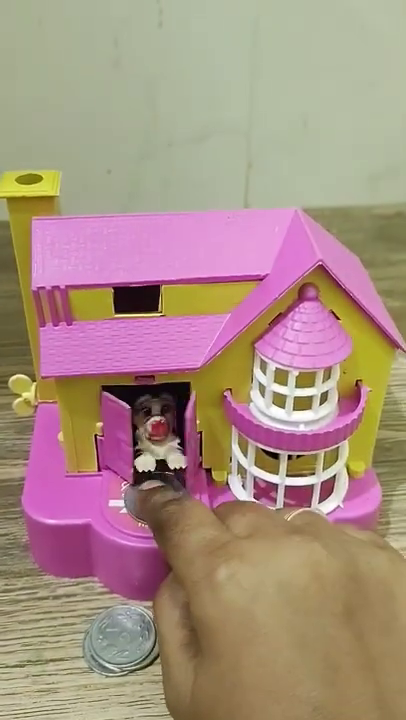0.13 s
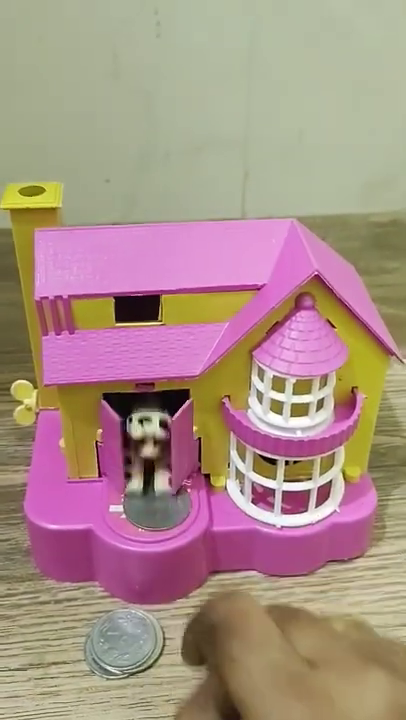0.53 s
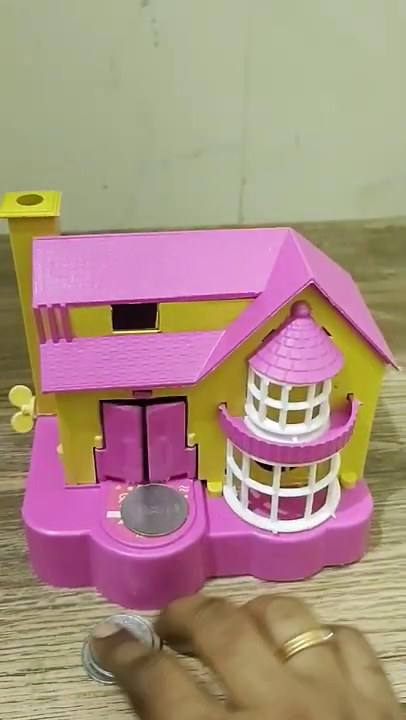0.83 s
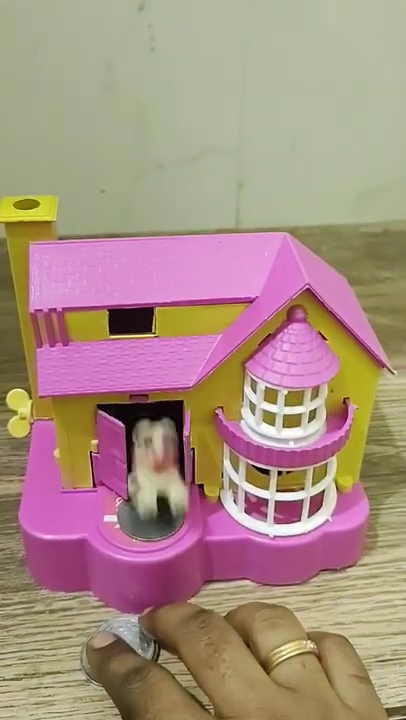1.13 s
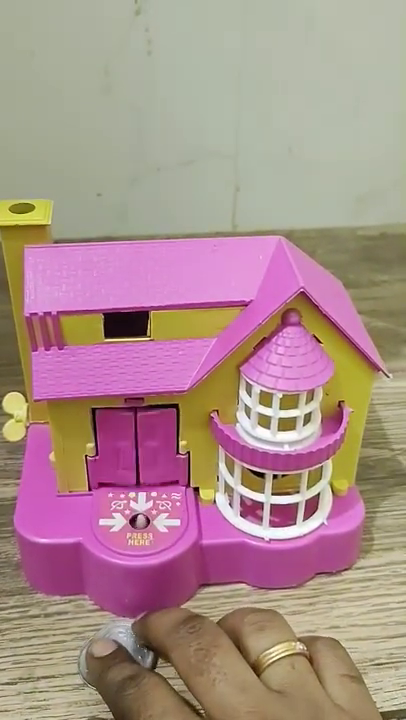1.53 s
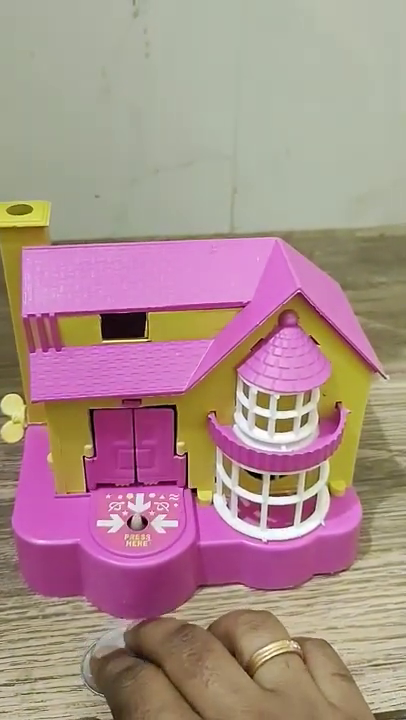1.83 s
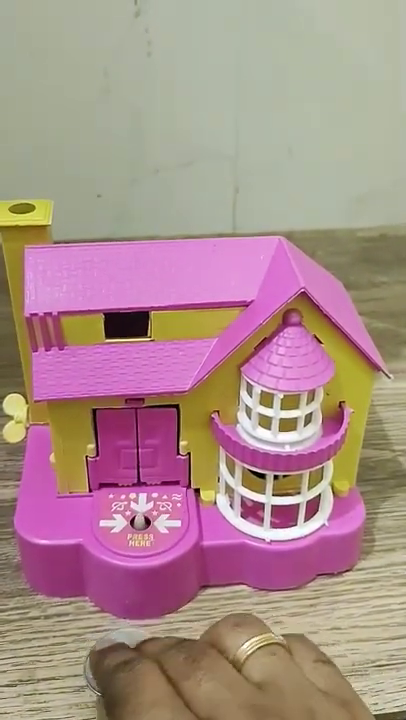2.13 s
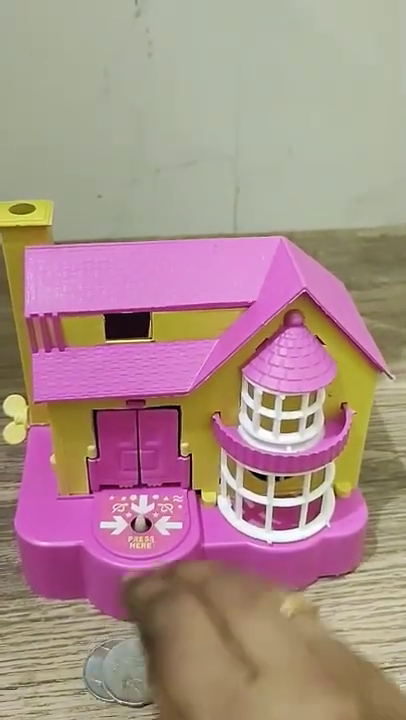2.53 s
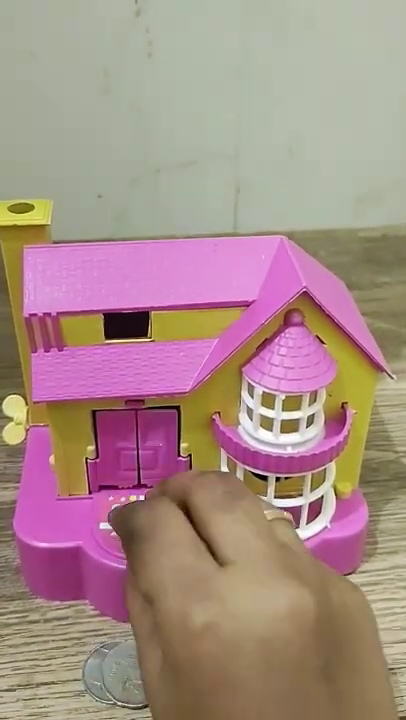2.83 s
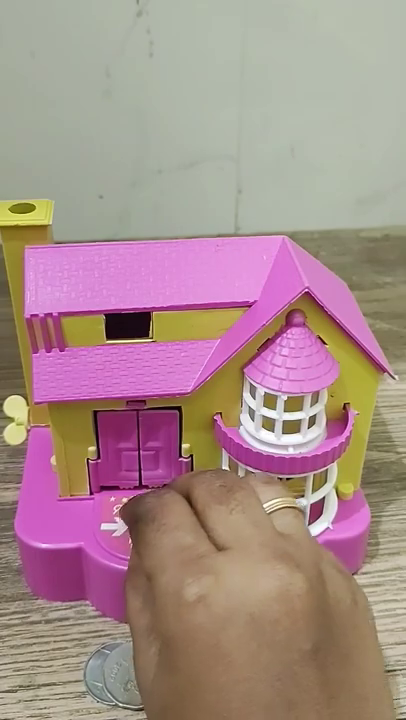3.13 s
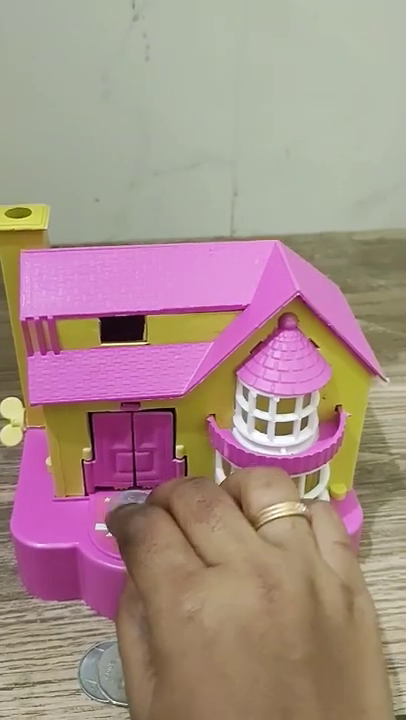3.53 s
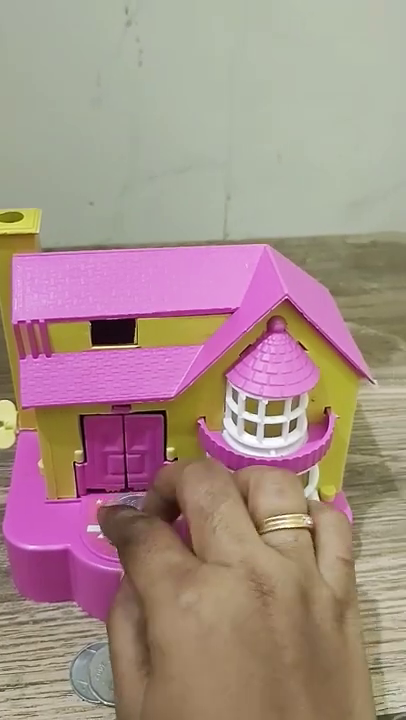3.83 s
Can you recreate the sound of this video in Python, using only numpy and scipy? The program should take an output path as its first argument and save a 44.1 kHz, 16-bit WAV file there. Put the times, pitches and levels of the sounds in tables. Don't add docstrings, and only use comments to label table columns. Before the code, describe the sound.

Loud clockwork gear rattle with knocking plastic doors runs down, followed by faint coin clinks and a tick.

```python
import sys
import numpy as np
from scipy import signal
from scipy.fft import rfft, irfft, next_fast_len
from scipy.io import wavfile
from scipy.ndimage import uniform_filter1d

SR = 44100
rng = np.random.default_rng(int(sys.argv[2]) if len(sys.argv) > 2 else 0)


def voltage_ratio(level):
    return 10 ** (np.asarray(level, float) / 20)


def transcribe(signal):
    frames = np.atleast_2d(signal).T
    limited = np.clip(frames, -1, 1)
    pcm = np.round(limited * 32767).astype(np.int16)
    wavfile.write(sys.argv[1], SR, pcm)


N = 176400
T = np.arange(N) / SR
BINS_HZ = np.arange(1, N // 2 + 2) * SR / N
MURMUR_FLUTTER_DB = 0.3


def rms_one(x):
    return x / np.sqrt(np.mean(x ** 2) + 1e-20)


def in_time(rows):
    s, *columns = np.transpose(rows)
    return [np.interp(T, s, column) for column in columns]


def at_hz(points, hz):
    points_hz, values = np.array(points).T
    return np.interp(np.log(hz), np.log(points_hz), values)


def drift(rate):
    pole = np.exp(-80 * np.pi * rate / SR)
    noise = rng.standard_normal(N // 40 + 2002)
    slow = signal.lfilter([1], [1, -2 * pole, pole * pole], noise)[2000:]
    return np.interp(np.arange(N) / 40, np.arange(len(slow)), rms_one(slow))


def noise_pair():
    return rng.standard_normal((2, N))


# pitch_hz, likeness (0-1)
LIKENESS = [(60, 1.0), (130, .99), (290, .75), (640, .85), (1400, .4), (3000, .15), (8000, 0.01)]
# pitch_hz, left_minus_right_db
LEAN = [(130, 0), (330, -3.5), (700, 3.5), (1300, .4), (2400, -2), (4400, -3.5), (9000, -1.5)]


def spread(pair):
    alike = np.clip(at_hz(LIKENESS, BINS_HZ), 0, 1)
    mid, side = rfft(pair)
    sign = np.array([[1], [-1]])
    left_right = np.sqrt(1 + alike) * mid + sign * np.sqrt(1 - alike) * side
    return irfft(left_right * voltage_ratio(sign * at_hz(LEAN, BINS_HZ) / 2), N)


def colour(pair, spectrum):
    low_hz, high_hz = spectrum[0][0], spectrum[-1][0]
    gain = voltage_ratio(at_hz(spectrum, BINS_HZ)) / (1 + (low_hz / BINS_HZ) ** 6) / (1 + (BINS_HZ / high_hz) ** 6)
    return rms_one(spread(irfft(rfft(pair) * gain, N)))


def bed(rows, spectrum, flutter_db, rate):
    level = voltage_ratio(in_time(rows)[0] + flutter_db * drift(rate))
    return level * colour(noise_pair(), spectrum)


def ring(clicks, hz, t60):
    r, w = voltage_ratio(-60 / (t60 * SR)), 2 * np.pi * hz / SR
    return signal.lfilter([0, np.sin(w)], [1, -2 * r * np.cos(w), r * r], clicks + 1e-18)


def strike(s, db, modes, dull_hz=1e6):
    out = np.zeros((2, N))
    luck = rng.normal(0, 1, (len(s), 2, len(modes)))
    for k, (hz, level_db, t60) in enumerate(modes):
        clicks = np.zeros((2, N))
        sign = (-1) ** k * np.sign(luck[:, ::-1, k] + [9, 0])
        size = voltage_ratio(db + level_db) / (1 + (hz / dull_hz) ** 2)
        clicks[:, (s * SR).astype(int)] = (size[:, None] * voltage_ratio(1.5 * luck[:, :, k]) * sign).T
        out += ring(clicks, hz, t60)
    return out


def puffs(s, db, decay_s):
    clicks = np.zeros(N)
    clicks[(s * SR).astype(int)] = voltage_ratio(db)
    return signal.lfilter([1], [1, -np.exp(-1 / (decay_s * SR))], clicks + 1e-18)


# start_s, level_db
HANDLING = [(0, -38), (.13, -36.5), (.41, -44.5), (.44, -26), (.52, -27), (.6, -28.5), (.75, -37),
            (.785, -27), (.96, -38), (1.05, -41), (1.4, -71), (3.035, -48.5), (3.06, -35), (3.14, -32),
            (3.26, -34), (3.38, -38), (3.45, -31.5), (3.62, -41), (3.7, -45.5), (3.82, -41.5), (4, -52.5)]
# pitch_hz, level_db (per Hz)
HANDLING_COLOUR = [(45, -20.5), (58, 1.5), (68, 4.5), (84, 0), (100, -1.5), (150, -9.5), (200, -23.5),
                   (450, -19.5)]
GRIP_EVEN_S, GRIP_EVEN = 0.05, 0.7


def handling():
    rumble = colour(noise_pair(), HANDLING_COLOUR)
    swell = uniform_filter1d(np.mean(rumble ** 2, axis=0), size=int(GRIP_EVEN_S * SR)) + 1e-3
    return voltage_ratio(in_time(HANDLING)[0]) * rms_one(rumble / swell ** (GRIP_EVEN / 2))


# pitch_hz, level_db (rms)
HUM = [(99.5, -61), (199.3, -50)]


def hum():
    out = 0
    for hz, db in HUM:
        level = np.sqrt(2) * voltage_ratio(db + 0.69 * drift(16.0))
        out = out + level * np.sin(2 * np.pi * hz * T + 0.3 * drift(10.0))
    return out


# start_s, level_db
ROOM = [(.05, -37), (1.98, -40.5), (2.4, -41.5), (2.65, -45.5), (3.03, -49), (3.2, -43.5), (3.7, -45.5),
        (4, -47.5)]
# pitch_hz, level_db (per Hz)
ROOM_COLOUR = [(60, -4), (120, 0), (170, -16), (350, -10), (600, -10), (1500, -15.5), (2900, -20.5),
               (3300, -33), (5000, -47.5)]


def room_murmur():
    return bed(ROOM, ROOM_COLOUR, flutter_db=MURMUR_FLUTTER_DB, rate=7.2)


# start_s, level_db
HISS = [(0, -67), (1.95, -65), (2.3, -67.5), (3.0, -72), (3.12, -75.5), (4, -71.5)]
# pitch_hz, level_db (per Hz)
HISS_COLOUR = [(3000, 1.5), (8000, -12), (17000, -17.5)]


def thin_hiss():
    return bed(HISS, HISS_COLOUR, flutter_db=MURMUR_FLUTTER_DB, rate=5)


# pitch_hz, width_hz, level_db
CASE = [(330, 30, -17), (578, 50, -10), (682, 55, 0), (785, 80, 0), (1040, 100, -13), (1435, 40, -14),
        (1620, 45, -4), (1786, 45, -7), (1920, 45, -11), (2510, 50, -9), (2724, 30, -11), (3510, 80, -9),
        (4620, 30, -8), (4975, 40, -3), (5650, 120, -9), (5953, 40, -5)]
# start_s, peak_db, dullness_hz
KNOCKS = [(.073, -32.5, 800), (.0765, -10, 1426), (.085, -23.5, 2230), (.117, -18, 1300),
          (.14, -20.5, 1300), (.202, -21.5, 1400), (.258, -23, 1300), (.473, -21, 1200), (.575, -23, 2500),
          (.606, -25, 1400), (.653, -27.5, 1300), (.735, -16.5, 1300), (.788, -19, 1400), (.928, -22, 1400),
          (1.13, -25, 1800), (1.344, -20.5, 1300), (1.367, -25.5, 1200), (1.370, -17, 2600),
          (1.377, -17, 1300), (1.387, -23, 1600), (1.405, -21.5, 1600), (1.459, -21, 1300),
          (1.666, -23, 1800), (1.734, -19, 1100), (1.7495, -15, 2000), (1.759, -18.5, 2200),
          (1.784, -15.5, 2600), (1.791, -21.5, 1600), (1.798, -26, 1500), (1.804, -25.5, 2600),
          (1.815, -21, 1200), (1.849, -29, 1200), (1.859, -20.5, 1100), (1.9015, -18.5, 1198)]
# start_s, level_db
SLAMS = [
    (0.076, -29),
    (1.751, -30.5),
    (1.786, -28),
]
# pitch_hz, level_db, t60_s
BASE = [(335, 0, 0.066)]
KNOCK_DB, KNOCK_WIDEN, KNOCK_LOW_HZ = 0, 0.85, 560
CRACK_DB, CRACK_S = -9.5, 0.0067


def knocks():
    s, db, dull_hz = np.transpose(KNOCKS)
    modes = [(hz, level_db, np.log(9) / width / KNOCK_WIDEN) for hz, width, level_db in CASE[:12]]
    no_bass = signal.butter(3, KNOCK_LOW_HZ, "high", fs=SR, output="sos")
    body = signal.sosfilt(no_bass, strike(s, db + KNOCK_DB, modes, dull_hz))
    body = body + strike(*np.transpose(SLAMS), BASE)
    crack_band = signal.butter(2, [700, 4500], "band", fs=SR, output="sos")
    crack = rms_one(signal.sosfilt(crack_band, noise_pair()))
    hardness_db = 20 * np.log10(dull_hz / 1300)
    return spread(body + puffs(s, db + CRACK_DB + hardness_db, CRACK_S) * crack)


PATCH_DB, PATCH_PER_S = 1.0, 15


def patches(x):
    whole = rfft(x)
    place = 2 * np.log2(np.clip(BINS_HZ, 1000, 16000) / 1000)
    out = 0
    for k in range(9):
        band = irfft(whole * np.clip(1 - abs(place - k), 0, 1), N)
        out = out + voltage_ratio(PATCH_DB * drift(PATCH_PER_S)) * band
    return out


# start_s, level_db, case_boom_db, panel_ring_db
DRIVE = [(.07, -31.5, 15.5, 13), (.2, -27, 3.5, 4), (.34, -25.5, 1, -3), (.42, -26.5, 5.5, 3),
         (.59, -24, 1.5, -0.5), (.72, -26, 3, 3.5), (.78, -24.5, 2, 6), (1.0, -24, 3, 3),
         (1.33, -26, 1.5, 4.5), (1.47, -25, -2, 3.5), (1.51, -28, -2.5, 4), (1.7, -23, 0.5, 2),
         (1.85, -26, 3.5, 5.5), (1.885, -36.5, -2, 9.5), (1.95, -54, 6.5, 2), (2.01, -85.5, 20, 2.5)]
# pitch_hz, level_db (per Hz)
RATTLE = [(400, -24), (600, -5.5), (1200, -5.5), (3000, -1.5), (5200, -2), (8000, -4.5), (10800, -8),
          (17000, 0)]
START_S, START_RISE_S = 0.074, 0.0021
TEETH_PER_S, TOOTH_SPREAD_DB, RATTLE_FLUTTER_DB = 10000, 1.5, 0.9
RATTLE_DB, CASE_DB, CASE_GAIN = 4, -5.5, 90
HOLLOW_HZ = 1200


def gears():
    level_db, boom_db, sing_db = in_time(DRIVE)
    contacts = rng.random((2, N)) < TEETH_PER_S / SR
    force = voltage_ratio(TOOTH_SPREAD_DB * rng.exponential(1, (2, N)))
    teeth = contacts * force * rng.choice([-1, 1], (2, N))
    teeth *= voltage_ratio(RATTLE_FLUTTER_DB * drift(35))
    case = np.zeros((2, N))
    for k, (hz, width, db) in enumerate(CASE):
        drive_db = boom_db if hz < HOLLOW_HZ else sing_db
        level = voltage_ratio(db + drive_db + 1.28 * drift(16)) * np.sqrt(width)
        case += level * ring(teeth[::-1, ::-1], hz, np.log(9) / width) * (-1) ** k
    rattle = voltage_ratio(RATTLE_DB) * patches(colour(teeth, RATTLE))
    running = np.clip((T - START_S) / START_RISE_S, 0, 1) * (T < DRIVE[-1][0])
    return running * voltage_ratio(level_db) * (rattle + voltage_ratio(CASE_DB) * spread(case) / CASE_GAIN)


# start_s, level_db
RUB = [(1.9, -80), (2.27, -80), (2.32, -61), (2.42, -69), (2.46, -61), (2.65, -79), (3.05, -87),
       (3.09, -53.5), (3.18, -49.5), (3.37, -56), (3.42, -52), (3.51, -49.5), (3.56, -46), (3.62, -54),
       (3.75, -62), (4, -86)]
# pitch_hz, level_db (per Hz)
RUB_COLOUR = [(600, -0.5), (1800, 0), (2750, 6), (3500, -7.5), (4500, -10), (6500, -13), (17000, -34.5)]


def finger_rub():
    return bed(RUB, RUB_COLOUR, flutter_db=MURMUR_FLUTTER_DB, rate=18)


# start_s, peak_db, second_coin_share (0-1)
CLINKS = [(2.12, -56, 0.7), (2.149, -57, 0.7), (2.185, -52.5, 0.6), (2.318, -47, 0.7), (2.346, -33, 1),
          (2.358, -39, 1), (2.44, -56, 0.6), (2.498, -26.5, 0.04), (2.506, -36, 0), (2.516, -41, 0.1),
          (2.531, -32, .03)]
# pitch_hz, level_db, t60_s
COIN_A = [(4500, -19, .1), (7750, -15, .08), (9065, -10, .13), (9749, -4, .08), (10220, -7, .12),
          (10580, -7, .12), (11170, -9, .13), (11620, -3, .12), (11670, -1, .15), (11800, -4, .12),
          (14040, -13, .08), (15200, -5, .04)]
# pitch_hz, level_db, t60_s
COIN_B = [(4400, -12, .08), (5500, -6, .02), (9518, -4, .06), (9900, -1, .03), (10810, -6, .05),
          (11830, -5, .12), (14400, -8, .06)]
# pitch_hz, level_db (per Hz)
JINGLE = [(3800, -16), (4500, -18), (6000, -23), (9000, -16), (11300, -10.5), (14000, -21), (17000, -9)]
CLINK_DB = -11.5
JINGLE_DB, JINGLE_S = -17.5, 0.024
TICK_DB, TICK_S = -12, 0.00067


def coins():
    s, db, share = np.transpose(CLINKS)
    share = np.clip(share, 0.02, 0.98)
    first = strike(s, db + CLINK_DB + 20 * np.log10(1 - share), COIN_A)
    second = strike(s, db + CLINK_DB + 20 * np.log10(share), COIN_B)
    bursts = puffs(s, db + JINGLE_DB, JINGLE_S) + puffs(s, db + TICK_DB, TICK_S)
    return spread(first + second) + bursts * colour(noise_pair(), JINGLE)


# start_s, level_db
DRAG = [(2.29, -91), (2.315, -57), (2.335, -66), (2.35, -52), (2.42, -72), (2.44, -60), (2.53, -68),
        (2.6, -66), (2.68, -89)]
# pitch_hz, level_db (per Hz)
DRAG_COLOUR = [(3600, -5.5), (4500, -1), (5500, -12), (7500, -9), (12000, -15.5), (16000, -18.5)]


def coin_drag():
    return bed(DRAG, DRAG_COLOUR, flutter_db=-1.0, rate=60)


# start_s, peak_db
TAPS = [
    (3.515, -51.5),
    (3.5185, -30),
    (3.5231, -34.5),
    (3.546, -41.5),
    (3.985, -43.5),
]
# pitch_hz, level_db, t60_s
TRAY = [(780, -11, .02), (1260, -11, .035), (1600, -13, .012), (1900, -10, .015), (2200, -10, .012),
        (2420, -4, .018), (2680, -1, .022), (3000, -6, .015), (3900, -12, .012), (4700, -13, .012)]
TAP_DB = 4.5
TAP_CRACK_DB, TAP_CRACK_S, TAP_CRACK_HZ = -31.5, 0.0116, 2500
SNAP_DB, SNAP_S = -9, 0.0012


def taps():
    s, db = np.transpose(TAPS)
    soften = signal.butter(1, TAP_CRACK_HZ, fs=SR, output="sos")
    crack = rms_one(signal.sosfilt(soften, np.diff(rng.standard_normal((2, N + 1)))))
    bursts = puffs(s, db + TAP_CRACK_DB, TAP_CRACK_S) + puffs(s, db + SNAP_DB, SNAP_S)
    return spread(strike(s, db + TAP_DB, TRAY) + bursts * crack)


WALLS_T60_S, WALLS_DB = 1.53, -22
WALL_LOW_HZ, WALL_CUT_HZ = 900, 3000


def walls(x):
    size = next_fast_len(N + SR)
    w = 2 * np.pi * np.arange(size // 2 + 1) / size
    dull = 1 / (1 + 1j * w * SR / (2 * np.pi * WALL_CUT_HZ))
    out = np.zeros((2, len(w)), complex)
    lags = (rng.uniform(0.009, 0.04, 16) * SR).astype(int)
    for k, lag in enumerate(lags):
        loop = voltage_ratio(-60 * lag / SR / WALLS_T60_S) * dull * np.exp(-1j * w * lag)
        out[k % 2] += loop / (1 - loop) * (-1) ** (k // 2)
    bass_cut = w / np.hypot(w, 2 * np.pi * WALL_LOW_HZ / SR)
    return spread(irfft(out * rfft(x.mean(axis=0), size) * bass_cut, size)[:, :N])


def scene():
    near = knocks() + gears() + coins() + taps()
    begun = T > KNOCKS[0][0] - 0.01
    in_room = (near + voltage_ratio(WALLS_DB) * walls(near)) * begun
    return in_room + handling() + hum() + room_murmur() + thin_hiss() + finger_rub() + coin_drag()


def band_limit(x):
    return signal.sosfilt(signal.butter(12, 16700, fs=SR, output="sos"), x)


MIC_LOW_HZ, CUTOFF_HZ = 56, 15620


def record(dry):
    bass_cut = signal.butter(2, MIC_LOW_HZ, "high", fs=SR, output="sos")
    top_cut = signal.cheby2(20, 55, CUTOFF_HZ, fs=SR, output="sos")
    mix = signal.sosfilt(np.vstack([bass_cut, top_cut]), dry)
    return band_limit(mix)


dry = scene()
out = record(dry)
transcribe(out)
```